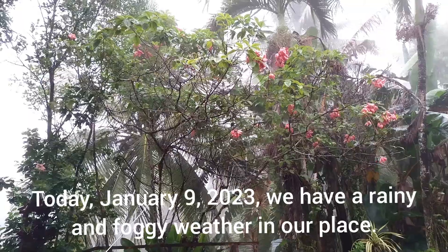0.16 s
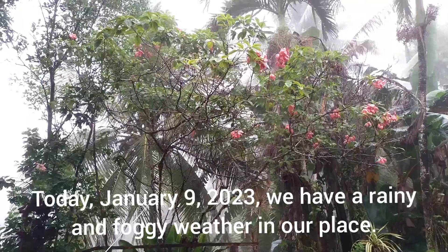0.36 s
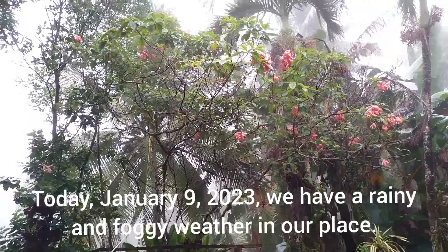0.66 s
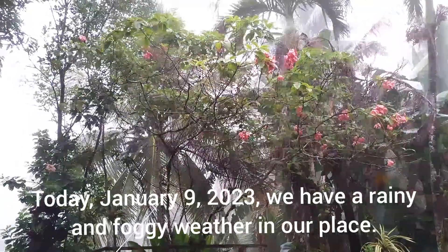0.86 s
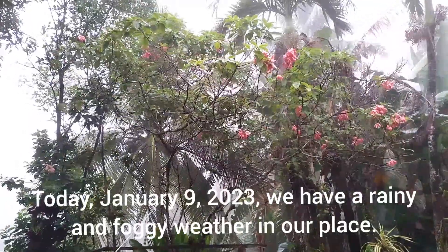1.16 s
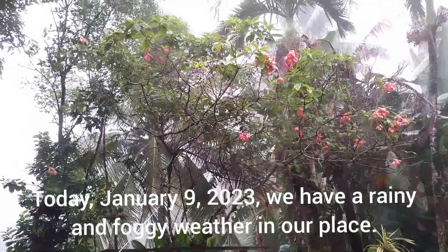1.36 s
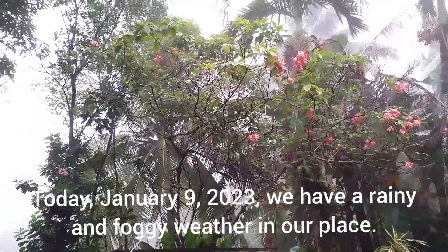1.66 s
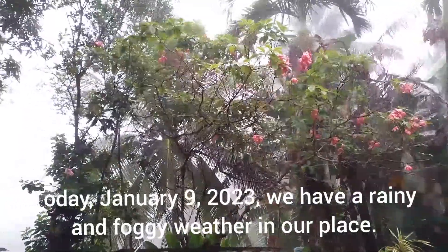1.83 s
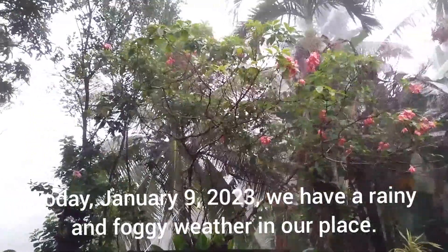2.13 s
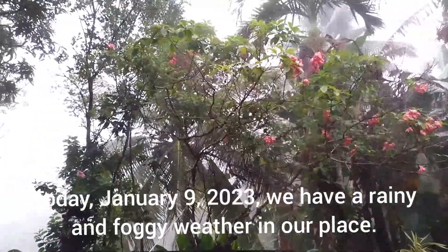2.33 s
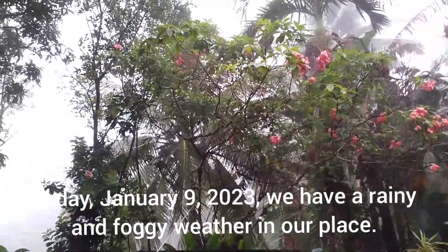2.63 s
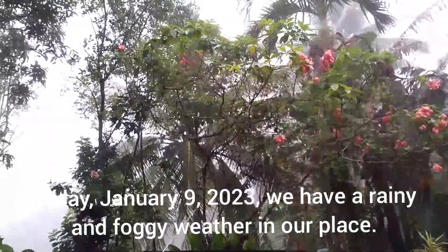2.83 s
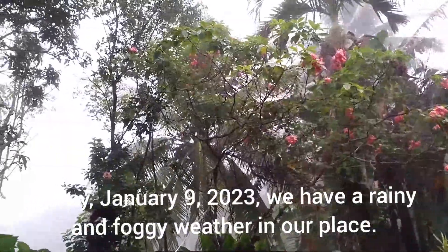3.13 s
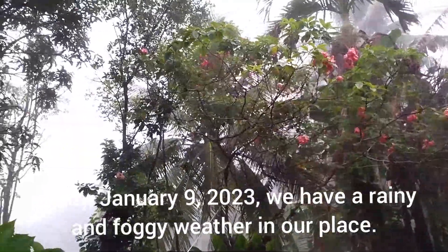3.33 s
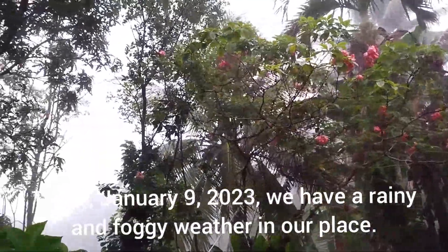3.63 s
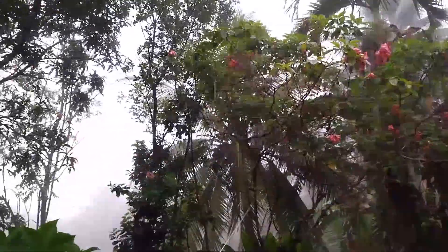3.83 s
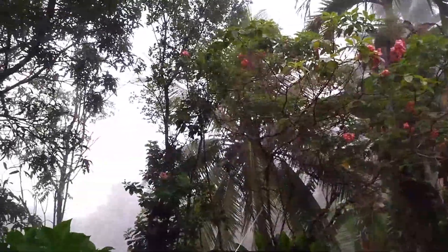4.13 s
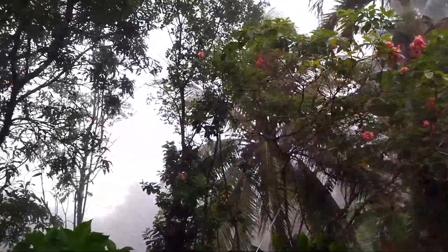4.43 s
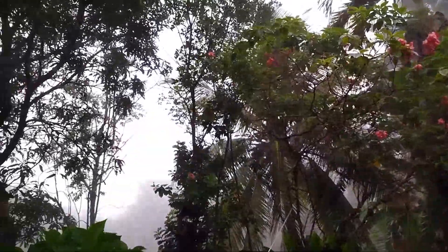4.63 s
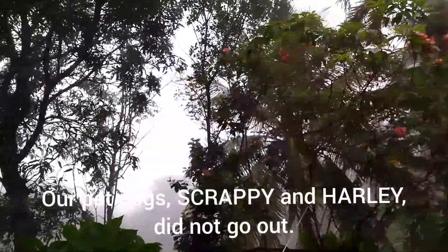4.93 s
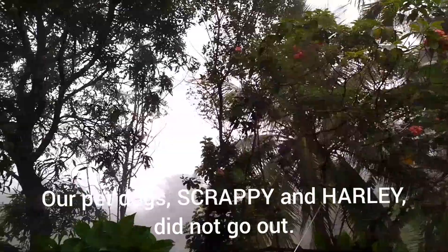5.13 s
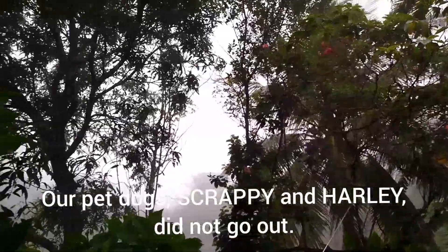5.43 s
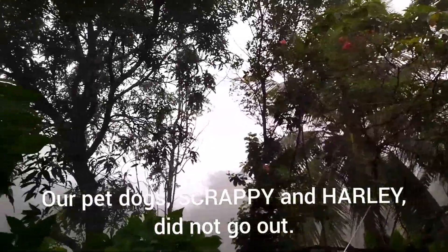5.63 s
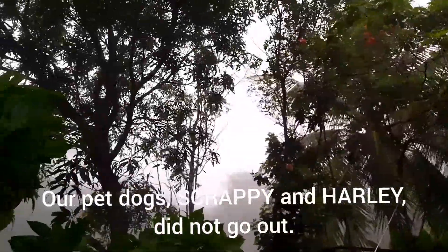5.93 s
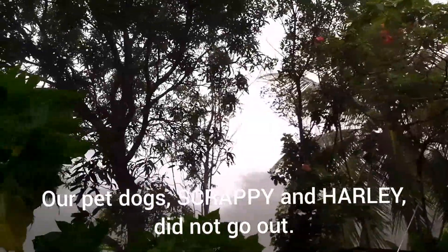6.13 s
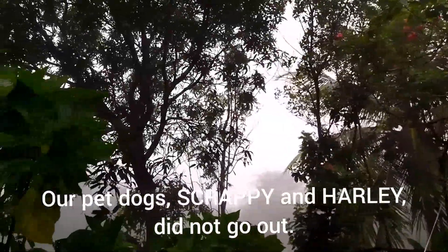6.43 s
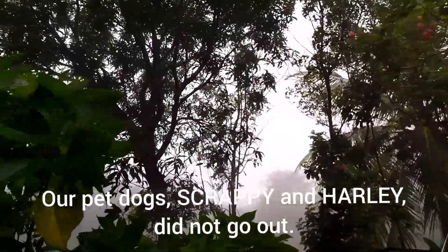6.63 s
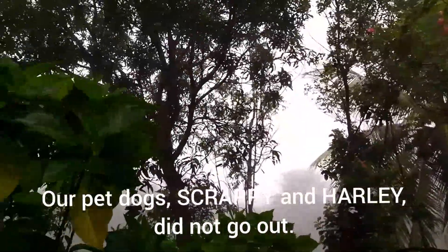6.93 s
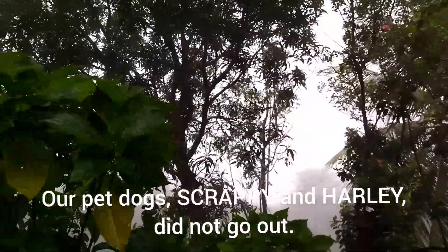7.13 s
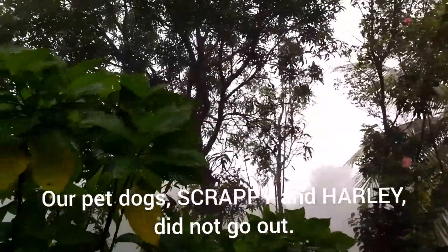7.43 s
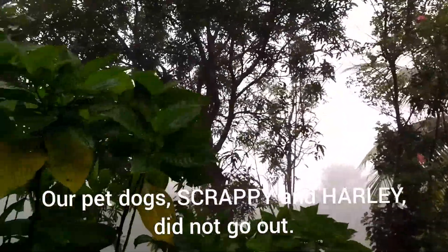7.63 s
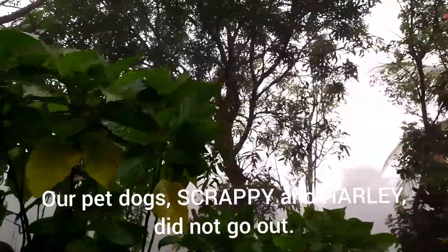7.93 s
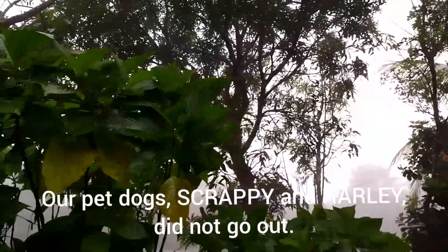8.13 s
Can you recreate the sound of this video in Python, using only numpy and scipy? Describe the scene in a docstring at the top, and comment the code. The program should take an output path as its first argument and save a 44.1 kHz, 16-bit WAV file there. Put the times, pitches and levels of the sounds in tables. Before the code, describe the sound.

Rain patters in a leafy garden, with fat drops hitting close foliage and low gusts thumping the microphone.

```python
"""A leafy garden in the rain. Heavy drops plop and snap on broad leaves close by, while smaller
drops patter further off over a steady wash, with swells of sizzle and thin splashes on top.
Gusts buffet the microphone in low lumps, hardest in the second half.
The recorder wakes with a faint hiss, falls silent, then fades the garden in."""
import sys
import numpy as np
from scipy import signal
from scipy.io import wavfile
from scipy.ndimage import uniform_filter1d, minimum_filter1d

SR = 44100
rng = np.random.default_rng(int(sys.argv[2]) if len(sys.argv) > 2 else 0)


def int16_out(signal):
    """Quantize to a 16-bit WAV file."""
    q = np.round(np.clip(np.atleast_2d(signal).T, -1, 1) * 32767)
    wavfile.write(sys.argv[1], SR, q.astype(np.int16))


N = 365456

# Tone of the recorder's waking hiss: freq_hz, relative_db
WAKE_TONE = [(59, -43), (100, -19), (600, -5), (5420, -13), (9410, -2), (16000, -26)]
# How alike the two sides of a hiss are: freq_hz, correlation
HISS_LIKENESS = [(100, 0.99), (500, 0.47), (1500, 0.2), (6000, 0.089), (15000, .03)]
# Which way a hiss leans: freq_hz, left_minus_right_db
HISS_BALANCE = [(60, -4), (240, 0.5), (3770, 1.5), (15000, -1)]
# Opening fader move: time_s, gain_db
FADE_IN = [(.19, -75), (.23, -28), (.3, -1.5)]
# Tone of the far rain: freq_hz, relative_db
WASH_TONE = [(120, -21), (200, 0.5), (316, -6), (579, -6.5), (1200, -5.5), (2150, -4.5), (2800, -13.5),
             (4770, -14.5), (9400, -20.5), (10500, -24), (15100, -23), (16000, -13.5)]
# Fader rides for the rainfall: time_s, wash_db, patter_db
RAIN_LEVELS = [(0.45, -30.5, -39), (2.15, -30.5, -35), (3.99, -30.5, -37), (4.92, -28.5, -33),
               (5.3, -29, -34), (6.15, -28, -29), (6.56, -30, -33.5), (7.61, -31, -31),
               (8.29, -32.5, -34.5)]
# Brief dips of the wash in hard gusts: centre_s, depth_db, half_length_s
WASH_DIPS = [(4.76, -3.5, 0.07), (5.01, -2.5, 0.12), (7.733, -7, 0.032)]
# Fader rides for the wind: time_s, slow_lumps_db, quick_lumps_db
GUST_LEVELS = [(0.3, -49, -64), (0.54, -36, -50), (0.96, -28, -57), (1.34, -40, -49), (1.77, -29, -39.5),
               (2.03, -26.5, -38.5), (2.59, -26, -38), (2.95, -31.5, -40), (3.75, -30.5, -33),
               (3.95, -21.5, -38.5), (4.5, -18.5, -36.5), (4.7, -14.5, -22.5), (5.62, -17.5, -24.5),
               (5.73, -18.5, -27.5), (5.87, -22, -23.5), (6.05, -19, -28.5), (6.38, -19.5, -28),
               (6.47, -29, -35.5), (6.76, -18, -26), (6.86, -19.5, -22), (7.5, -17, -13.5),
               (7.78, -19.5, -20), (8.1, -17, -19.5), (8.29, -19, -24.5)]
# Thin, bright splashes: start_s, level_db
SPLASHES = [(0.5106, -32), (3.0743, -30), (3.5033, -31), (4.2316, -30), (5.3386, -31), (5.8799, -29),
            (6.053, -24), (6.1263, -28), (7.9447, -34)]
# Heavy drops on near leaves: peak_s, level_db, pitch_hz, left_minus_right_db, snap_relative_db
LEAF_DROPS = [(0.582, -22, 600, 0, -4), (0.597, -13.5, 690, -2, -15), (0.61, -12.5, 1690, -1, -23),
              (0.6734, -10.5, 830, -3, -16), (0.941, -16, 1170, 1, -17), (0.9998, -12, 417, 0, -21),
              (1.0671, -18, 900, 0, -3), (1.092, -7.5, 500, 3, -8), (1.172, -19, 1100, 10, -15),
              (1.187, -19, 1190, 9, 0), (1.575, -11.5, 1110, 4, -6), (1.705, -7, 640, 4, -6),
              (1.8283, -18, 1380, 5, -4), (1.867, -14.5, 460, -1, -15), (1.9603, -7, 525, 3, -16),
              (1.9755, -10.5, 1210, 5, -27), (2.0455, -7, 1370, 9, -40), (2.1206, -15.5, 513, 1, -18),
              (2.2093, -19, 1840, 7, -15), (2.398, -9, 1800, 11, -21), (2.418, -11, 636, -4, -21),
              (2.424, -11, 696, -5, -20), (2.443, -7, 670, 0, -16), (2.5065, -16, 790, -7, -7),
              (2.7956, -9, 1270, 0, -32), (2.877, -8, 910, 5, -2), (3.0859, -14, 404, 11, -15),
              (3.0922, -14, 1200, 8, -20), (3.161, -8, 734, 1, -31), (3.1847, -12, 1540, 5, -24),
              (3.314, -10, 825, 7, -3.5), (3.391, -13, 480, 1, -18), (3.499, -12, 1200, -5, -15),
              (3.5056, -9.5, 816, -1, -6), (3.5557, -13, 1500, 2, -18), (3.5813, -4.5, 570, 3, -7.5),
              (3.6989, -6.5, 684, 1.5, -13), (3.7343, -11.5, 1560, -3, -25), (3.791, -13.5, 880, 9, 1),
              (3.8052, -16, 1400, 4, -8), (3.964, -9.5, 1060, 2, -10), (3.9956, -4.5, 610, 0, -37),
              (4.093, -12.5, 403, 8, -16), (4.19, -13.5, 503, 1, -15), (4.32, -13.5, 920, -10, -9),
              (4.3371, -8.5, 1070, 1, -1), (4.3737, -11, 880, 11, -8), (4.3815, -11.5, 754, 3, 1),
              (4.694, -2.5, 615, 3, -9), (4.7147, -11, 490, 6, -3), (4.8385, -16, 850, 19, -14),
              (5.1033, -15, 504, 16, -29), (5.187, -14, 750, 12, -18), (5.245, -11, 1070, 12, -17),
              (5.28, -16, 810, 11, 0), (5.3673, -12.5, 785, 9, -3), (5.4803, -12.5, 506, 12, 2),
              (5.503, -3.5, 740, 12, -17), (5.562, -12, 660, 12, -19), (5.5709, -10, 845, 12, -2),
              (5.779, -9.5, 466, 10, -4), (5.8913, -5.5, 1080, 5, -27), (5.9206, -15, 790, 9, -22),
              (5.942, -15, 1840, 2, -16), (6.0291, -18, 1580, 5, -16), (6.0573, -14, 860, 8, 5.5),
              (6.1048, -9.5, 1190, 5, -24), (6.1752, -7.5, 1280, 5, -16), (6.1919, -4.5, 915, 0, -25),
              (6.2657, -15, 800, 0, -18), (6.2741, -10.5, 1000, 0, -17), (6.295, -8, 745, 3, -20),
              (6.302, -15, 1840, 3, -17), (6.321, -15, 545, 7, 8), (6.3392, -11, 600, -2, -6),
              (6.3735, -2.5, 766, -2, -20), (6.402, -5.5, 1190, 0, -11), (6.474, -12, 1700, 4, -18),
              (6.4913, -11.5, 1550, 1, -17), (6.565, -4.5, 493, 2, -7.5), (6.6145, -6, 503, 6, -8),
              (6.682, -6, 815, 1, -31), (6.7773, -8, 1280, 3, -33), (6.7924, -7.5, 690, 2, -14),
              (6.9738, -9, 740, -2, -9), (7.043, -13, 655, -1, -2), (7.071, -5.5, 403, 4, -28),
              (7.1306, -18, 600, 0, -20), (7.1877, -9.5, 970, -1, -17), (7.2092, -4, 1170, 2, -23),
              (7.235, -10, 800, 1, -19), (7.2805, -14, 490, 9, -6), (7.3243, -3.5, 1260, 0, -19),
              (7.361, -11, 500, 4, -9), (7.3817, -10.5, 660, -2, -15), (7.4026, -9.5, 965, -1, -11),
              (7.454, -11.5, 1070, -2, -25), (7.5408, -10, 910, 0, -13), (7.5475, -5, 800, 2, -21),
              (7.605, -7, 1310, -3, -26), (7.7924, -15, 690, 15, -13), (7.8313, -8, 885, 9, -12),
              (8.0105, -9, 584, 2, -18), (8.0574, -9.5, 1420, 2, -21), (8.1097, -7.5, 730, 3, -24),
              (8.1157, -13, 700, 2, -20), (8.1262, -11, 820, -6, -21)]
# Early reflection off the ground: delay_s, gain_db
GROUND_ECHOES = [(.0089, -9.5)]
# Low thuds, mostly wind on the microphone, a few the low body of heavy drops: peak_s, level_db, pitch_hz
LOW_THUDS = [(0.863, -8, 71), (1.643, -15.5, 74), (1.706, -12.5, 255), (1.813, -15, 78), (1.967, -14, 208),
             (1.997, -14.5, 78), (2.198, -16, 80), (2.377, -15, 82.5), (2.431, -12, 220), (2.455, -7, 85),
             (2.572, -18, 90), (2.656, -16.5, 64), (2.786, -11.5, 85), (2.899, -15.5, 68.4),
             (3.101, -12.5, 199), (3.287, -18, 78), (3.772, -11.5, 82), (3.906, -5, 119), (3.973, -6.5, 90),
             (4.15, -9, 80), (4.259, -10, 129), (4.336, -5, 116), (4.558, -10, 72), (4.697, -1.5, 181),
             (4.72, -2.5, 179), (4.791, -15, 61.5), (4.905, -7, 142), (4.924, -5.5, 86), (4.962, 1.5, 141),
             (4.994, -0.5, 102), (5.016, 0, 170), (5.031, -14, 252), (5.089, -14, 245), (5.215, -3.5, 144),
             (5.232, 0.5, 160), (5.264, -4.5, 110), (5.282, -6, 130), (5.322, -2, 181), (5.403, -4.5, 78.4),
             (5.422, -2, 106), (5.474, -7.5, 116), (5.503, -4.5, 146), (5.538, -5, 88), (5.606, -1.5, 150),
             (5.752, -5, 118), (5.982, -11, 118), (6.007, -3, 108), (6.035, -9.5, 110), (6.136, -10.5, 108),
             (6.34, -3, 117), (6.381, -13, 94), (6.422, -5.5, 104), (6.823, -1, 121), (6.849, -8, 150),
             (6.876, 0.5, 203), (7.062, -3, 63.5), (7.116, -1.5, 171), (7.244, -5, 75), (7.273, -5.5, 75),
             (7.334, -5.5, 166), (7.379, -13, 68), (7.449, 0.5, 105), (7.554, -5, 151), (7.589, -3, 84),
             (7.614, -11, 101), (7.635, -4, 82), (7.685, -6, 131), (7.7184, -3, 340), (7.734, -7, 170),
             (7.871, -2, 177), (7.902, -7.5, 108), (7.988, -2.5, 169), (8.094, -2, 204), (8.134, -1.5, 91),
             (8.269, -11, 82.7)]
# Swells of sizzle on small leaves: start_s, end_s, level_db
SIZZLE_SWELLS = [(1.8, 3.5, -45), (3.72, 4.15, -44.5), (5.155, 6.42, -45)]


def gain_of(db):
    return 10 ** (np.asarray(db) / 20)


def unit_rms(x):
    return x / np.sqrt(np.mean(x ** 2) + 1e-20)


def at_freq(points, hz):
    freqs, values = np.transpose(points)
    return np.interp(np.log(hz + 1), np.log(freqs + 1), values)


def rides(rows):
    times, *columns = np.transpose(rows)
    return [np.interp(np.arange(N) / SR, times, column) for column in columns]


def add(mix, start_s, sound):
    part = mix[:, round(start_s * SR):][:, :sound.shape[1]]
    part += sound[:, :part.shape[1]]


def band(noise, edges_hz, order=2):
    sos = signal.butter(order, edges_hz, "bandpass", fs=SR, output="sos")
    return unit_rms(signal.sosfilt(sos, noise))


def hiss(tone, patchy_db, flicker_db):
    """Stereo noise with drifting patches of colour and a flicker shared by all bands."""
    frames, hz = N // 128 + 5, np.fft.rfftfreq(512, 1 / SR)
    re, im, other_re, other_im, patches = rng.standard_normal((frames, len(hz), 5)).T
    patches = uniform_filter1d(patches, size=8, axis=0)
    patches = unit_rms(uniform_filter1d(patches, size=16, axis=1))
    flicker = unit_rms(uniform_filter1d(rng.standard_normal(frames), size=30))
    likeness = at_freq(HISS_LIKENESS, hz)[:, None]
    left = re + 1j * im
    right = likeness * left + np.sqrt(1 - likeness ** 2) * (other_re + 1j * other_im)
    colour_db = at_freq(tone, hz)[:, None] + patchy_db * patches + flicker_db * flicker
    balance_db = np.multiply.outer([.5, -.5], at_freq(HISS_BALANCE, hz))[:, :, None]
    spectra = np.array([left, right]) * gain_of(colour_db + balance_db)
    return unit_rms(signal.istft(spectra, nperseg=512, noverlap=384)[1][:, :N])


def waking_hiss(length_s=.116):
    """The recorder wakes with a faint hiss that cuts off dead."""
    gate = np.arange(N) < length_s * SR
    return gain_of(-62) * hiss(WAKE_TONE, patchy_db=2, flicker_db=2) * gate


def slap(hz, decay_cycles, rise_cycles):
    """A push outward and a swing back that rings down fast."""
    cycles = np.arange(round(5 * SR / hz)) * hz / SR
    wave = np.sin(2 * np.pi * cycles) * np.exp(-cycles / decay_cycles)
    wave *= 1 - np.exp(-cycles / rise_cycles)
    return wave / abs(wave).max()


def scatter(lo_hz, hi_hz, per_s, spread_db, pan_db, lag_s, decay_cycles, rise_cycles, size_cap=4):
    """Random slaps at 16 pitches, each with its own stereo spot; most are small, a few large."""
    sizes = np.minimum(rng.exponential(1, N), size_cap)
    hits = gain_of(spread_db * sizes) * (rng.random(N) < per_s / SR)
    voice, places = rng.integers(0, 16, N), rng.uniform(-1.07, 1, 16)
    out = np.zeros((2, N))
    for k, (hz, place) in enumerate(zip(np.geomspace(lo_hz, hi_hz, 16), places)):
        train = signal.oaconvolve(hits * (voice == k), slap(hz, decay_cycles, rise_cycles))[:N]
        out[0] += gain_of(pan_db * place) * train
        out[1] += gain_of(-pan_db * place) * np.roll(train, round(lag_s * SR * place))
    return unit_rms(out)


def far_wash(level_db):
    """Distant rain blurs into a bed of noise, with a fine fizz of droplets tucked under it."""
    t = np.arange(N) / SR
    dips_db = sum(db * np.exp(-((t - s) / half_s) ** 2) for s, db, half_s in WASH_DIPS)
    bed = hiss(WASH_TONE, patchy_db=1.78, flicker_db=1.02)
    fizz = scatter(2650, 13400, per_s=650, spread_db=2, pan_db=8.5, lag_s=.00037,
                   decay_cycles=1.2, rise_cycles=.13)
    return gain_of(level_db + dips_db) * (bed + gain_of(-13) * fizz)


def patter(level_db, heavy_drops, shake_s=.0066):
    """Middling drops patter, swelling after each heavy drop as the struck leaf sheds droplets."""
    taps = scatter(520, 2400, per_s=400, spread_db=4, pan_db=-1, lag_s=.00056,
                   decay_cycles=.6, rise_cycles=.24, size_cap=2.6)
    shake = signal.lfilter([1], [1, -np.exp(-1 / (shake_s * SR))], (heavy_drops ** 2).mean(0))
    swell = 1 + gain_of(-8) * np.sqrt(shake / shake.mean())
    return gain_of(level_db) * swell * taps


def wind():
    """Eddies press on both microphone ports in slow and quick lumps; the low thuds mix in here."""
    slow_db, quick_db = rides(GUST_LEVELS)
    slow = scatter(43.4, 125.3, per_s=80, spread_db=3.5, pan_db=2.5, lag_s=.00035,
                   decay_cycles=1, rise_cycles=.5, size_cap=2)
    quick = scatter(144.8, 359, per_s=180, spread_db=2.5, pan_db=4, lag_s=.00032,
                    decay_cycles=.93, rise_cycles=.66, size_cap=3)
    thuds = low_thuds()
    power = (thuds ** 2).mean(0) + gain_of(slow_db - .5) ** 2
    # The lumps swell around each thud.
    surge = abs(uniform_filter1d(power, size=4000) / uniform_filter1d(power, size=20000)) ** .49
    pressure = surge * (gain_of(slow_db) * slow + gain_of(quick_db) * quick) + thuds
    return pressure + .2 * pressure ** 2  # pushes come to a point, the suction after is flatter


def splashes(attack_s=.001, decay_s=.0049):
    """Short, airy puffs of fine spray, different on each side."""
    out, t = np.zeros((2, N)), np.arange(SR // 16) / SR
    spray = band(rng.standard_normal((len(SPLASHES), 2, len(t))), (9000, 15800))
    envelope = np.exp(-t / decay_s) * (1 - np.exp(-t / attack_s))
    for (start_s, level_db), puff in zip(SPLASHES, spray):
        add(out, start_s, gain_of(level_db) * envelope * puff)
    return out


def plop(hz, slowing=.7, decay_cycles=.85, attack_s=.00015):
    """A struck leaf gives one cycle and stops dead: a quick push, then a slower swing back."""
    cycles = np.arange(round(2 * SR / hz)) * hz / SR
    wave = np.sin(2 * np.pi * cycles ** slowing) * np.exp(-(cycles / decay_cycles) ** 3)
    wave *= 1 - np.exp(-(cycles / hz / attack_s) ** 2)
    return wave / abs(wave).max()


def leaf_drops():
    """Each heavy drop plops on a leaf, snaps as it bursts and spatters; the leaf shivers on."""
    out, t = np.zeros((2, N)), np.arange(SR // 16) / SR
    noise = rng.standard_normal((len(LEAF_DROPS), 2, len(t)))
    spatter = unit_rms(signal.lfilter(*signal.butter(2, 1900, fs=SR), noise)) * np.exp(-t / .0046)
    shiver = band(noise[:, :, ::-1], (200, 700), order=1) * np.exp(-t / .015)
    wetness_db = rng.uniform(-6, 4, (len(LEAF_DROPS), 1, 1))  # some land dry, some splash
    tails = gain_of(wetness_db - 24) * (spatter + gain_of(4.5) * shiver)
    snaps = gain_of(-5.5) * band(noise[:, ::-1], (1400, 4800)) * np.exp(-t / .00048)
    tick = slap(2650, decay_cycles=.45, rise_cycles=.35)
    snaps[:, :, :len(tick)] += tick
    for (peak_s, level_db, hz, pan_db, snap_db), tail, snap in zip(LEAF_DROPS, tails, snaps):
        sides = gain_of(level_db + np.array([[.5], [-.5]]) * pan_db)
        drop = gain_of(snap_db) * snap + tail
        add(drop, 0, plop(hz)[None])
        add(out, peak_s - .2 / hz, sides * drop)  # the push tops out a fifth of a cycle in
    return out


def with_ground_echo(direct):
    """The ground throws back an early reflection, a little sooner on the right."""
    out = direct.copy()
    for delay_s, gain_db in GROUND_ECHOES:
        out[0] += gain_of(gain_db) * np.roll(direct[0], round(delay_s * SR))
        out[1] += gain_of(gain_db) * np.roll(direct[1], round(.92 * delay_s * SR))
    return out


def low_thuds():
    """Swells of a cycle or two: mostly wind on the microphone, a few the low body of heavy drops."""
    out = np.zeros((2, N))
    offsets = rng.uniform(-.99, 1, (len(LOW_THUDS), 2))
    for (peak_s, level_db, hz), (shift, skew) in zip(LOW_THUDS, offsets):
        cycles = np.arange(-2 * SR / hz, 3 * SR / hz) * hz / SR
        envelope = np.exp(-(cycles / np.where(cycles < 0, .5, .7)) ** 2)
        phase = 2 * np.pi * cycles + .53 * shift + .26 * skew * np.array([[1], [-1]])  # one side leads
        add(out, peak_s - 2 / hz, gain_of(level_db) * envelope * np.cos(phase))
    return out


def leaf_sizzle(floor_db=-59, edge_s=.06):
    """Dense ticks on small leaves make a bright sizzle that swells up from a faint floor."""
    t = np.arange(N) / SR
    swells = sum(gain_of(db) * (np.tanh((t - start_s) / edge_s) - np.tanh((t - end_s) / edge_s)) / 2
                 for start_s, end_s, db in SIZZLE_SWELLS)
    ticks = scatter(4400, 6400, per_s=1700, spread_db=4, pan_db=3, lag_s=.0003,
                    decay_cycles=2.1, rise_cycles=.86)
    return (gain_of(floor_db) + swells) * band(ticks, (4400, 6780), order=4)


def limiter(mix, ceiling_db=-.21, release_db_per_s=60):
    """The hardest gusts duck the whole mix, rain included."""
    peak_db = 20 * np.log10(abs(mix).max(0) + 1e-9)
    release_db = np.arange(N) * release_db_per_s / SR
    held_db = np.maximum.accumulate(peak_db + release_db) - release_db
    over_db = np.maximum(held_db - ceiling_db, 0)
    duck_db = uniform_filter1d(-minimum_filter1d(-over_db, size=200), size=200)  # eases in early
    return mix / gain_of(duck_db)


def scene():
    """Far rain behind, drops on leaves up front, wind right on the microphone."""
    wash_db, patter_db = rides(RAIN_LEVELS)
    bed = far_wash(wash_db) + leaf_sizzle()
    heavy_drops = leaf_drops()
    leaves = with_ground_echo(heavy_drops + patter(patter_db, heavy_drops))
    return bed + leaves + splashes() + wind()


def record(dry):
    """Low cut, fade-in and limiter, then the waking hiss and a steep high cut over everything."""
    live = signal.sosfilt(signal.butter(2, 36, "highpass", fs=SR, output="sos"), dry)
    live = limiter(live * gain_of(rides(FADE_IN)[0]))
    high_cut = signal.firwin(511, 15850, window=("kaiser", 9), fs=SR)
    return signal.oaconvolve(live + waking_hiss(), high_cut[None], "same")


dry = scene()
out = record(dry)
int16_out(out)
```